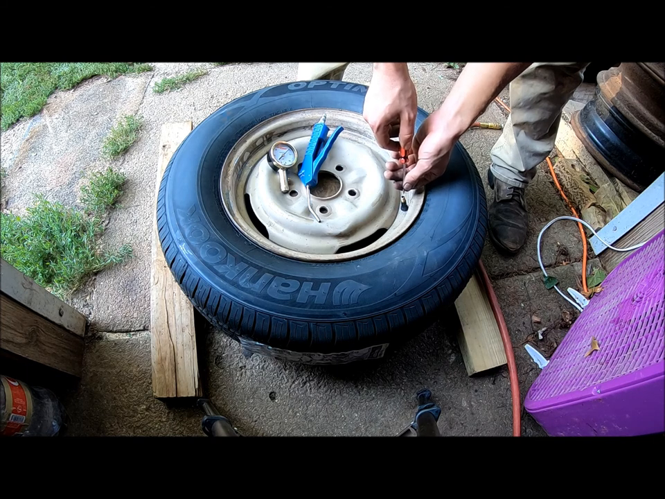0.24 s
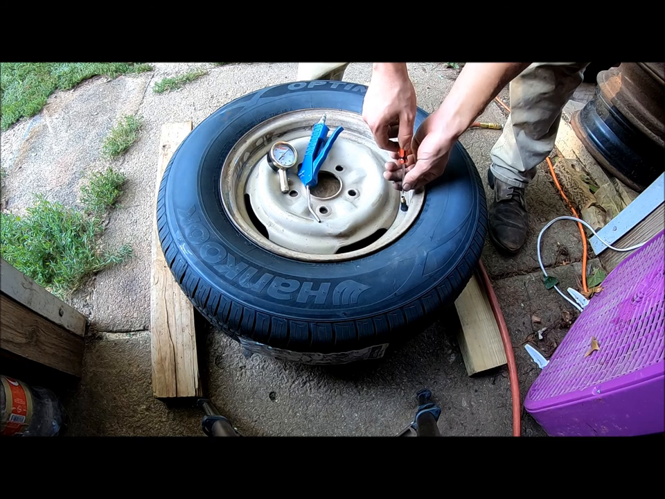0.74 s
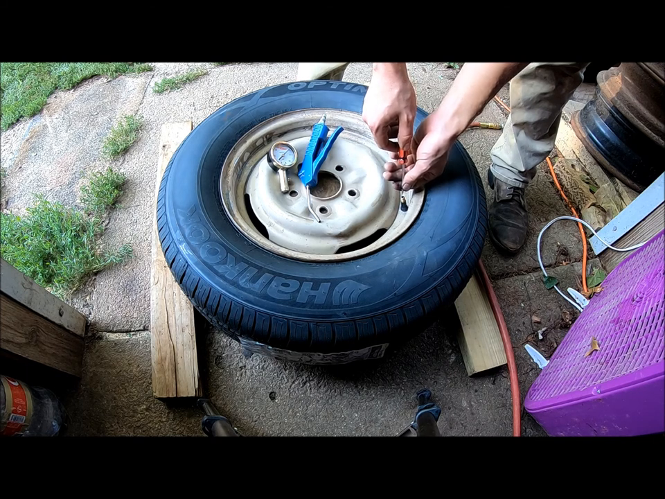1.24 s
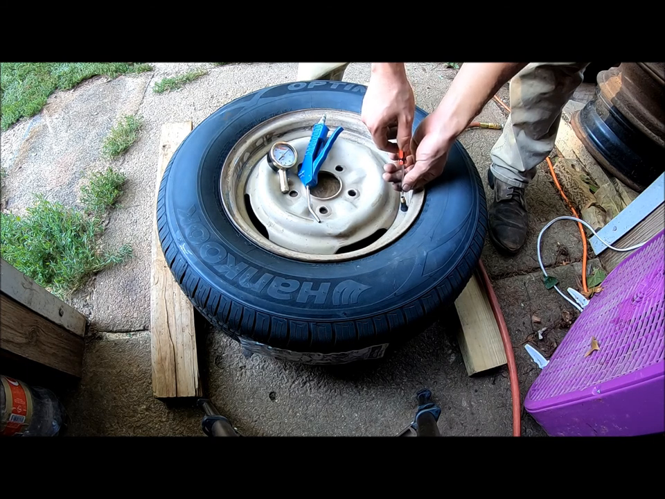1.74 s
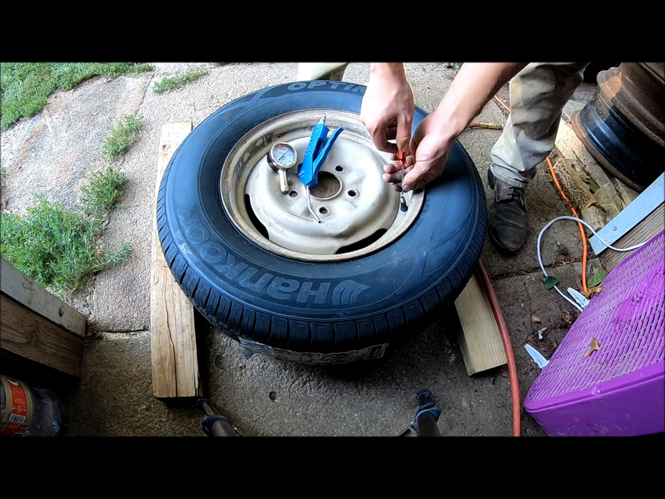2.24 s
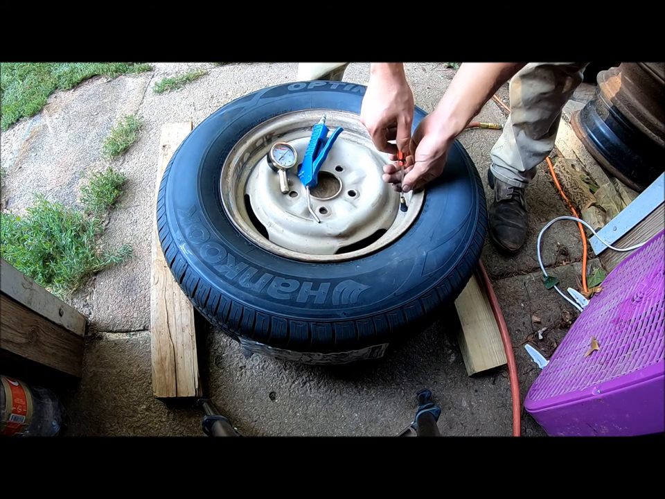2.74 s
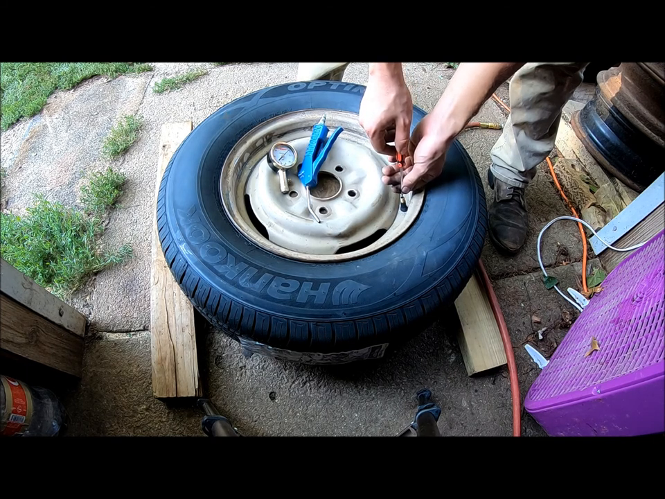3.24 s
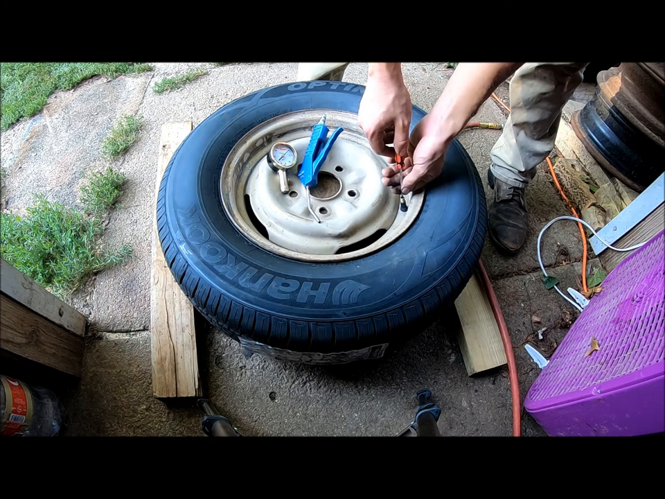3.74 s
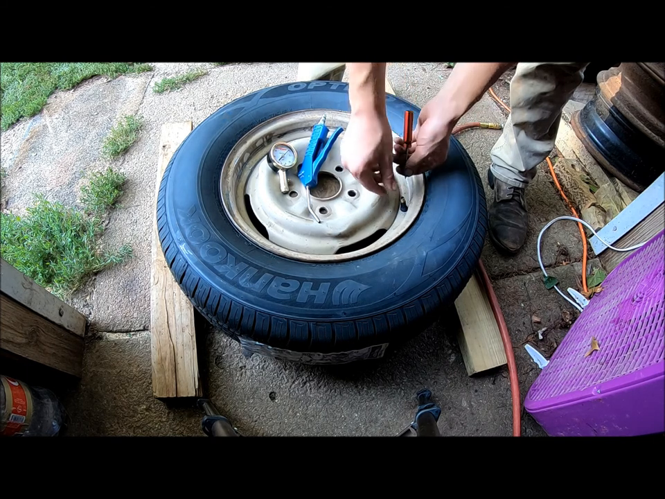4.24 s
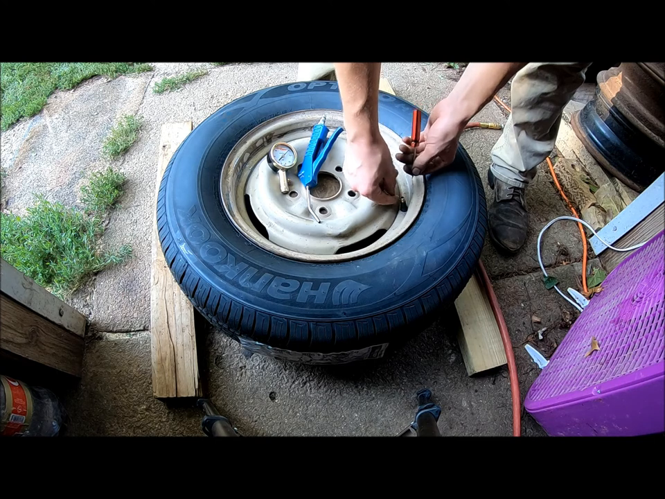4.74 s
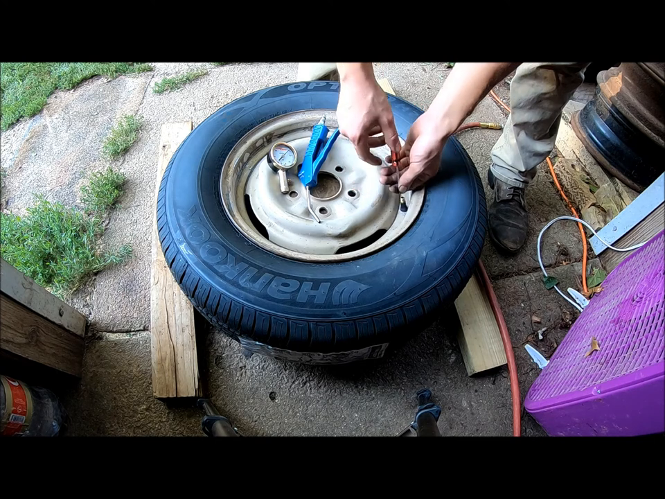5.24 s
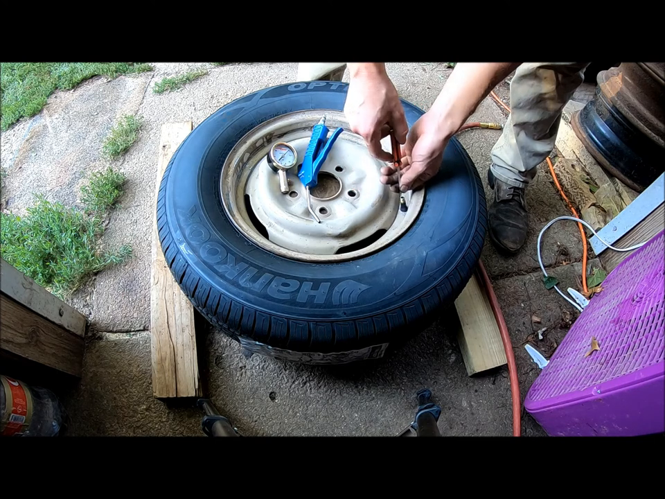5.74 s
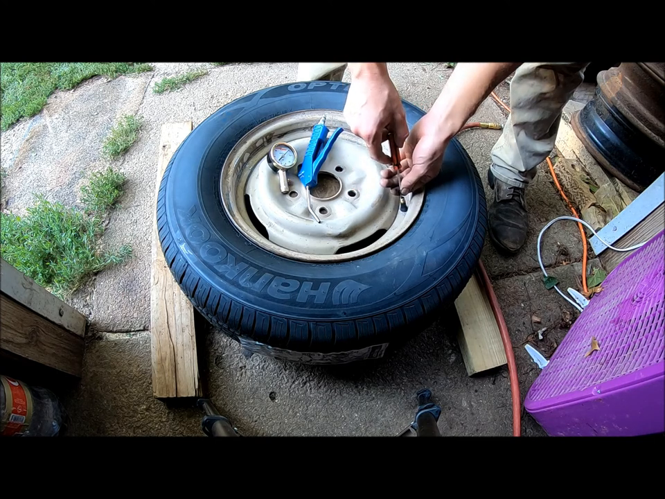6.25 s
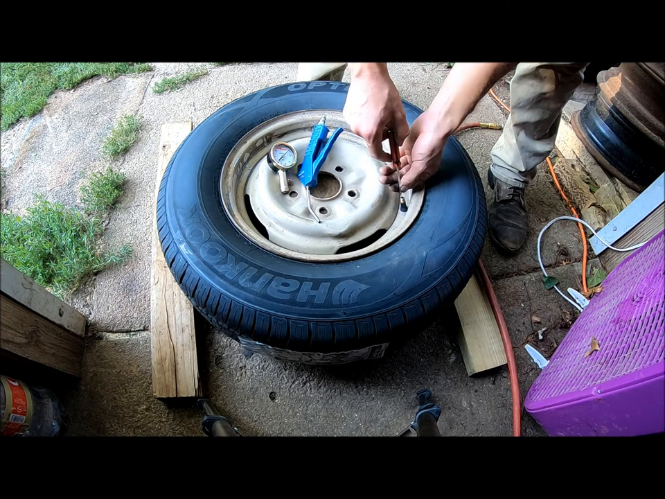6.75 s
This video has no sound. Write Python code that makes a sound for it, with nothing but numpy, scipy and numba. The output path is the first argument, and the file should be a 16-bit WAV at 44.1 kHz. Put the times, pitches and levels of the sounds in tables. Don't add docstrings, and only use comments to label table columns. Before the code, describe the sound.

From 0 s a tire valve is already venting: a dense, bright, sibilant hiss, strongest around seven kilohertz, with some midrange rush and little bass. It fluctuates finely and declines smoothly. Around 1.2 s the colour shifts a little as hands move, and from about 2.2 s a narrow airy whistle stands out more. By 4 s the jet is clearly weaker and slacker. At about 4.6 s a fingertip shuts it almost instantly, leaving a tiny leak and exposing a quiet low fan hum; at about 4.7 s it opens again over a tenth of a second, with a thin singing tone at about 4.8 s. The softer hiss continues, changing shade around 5.4 and 6 s, then sinks further from 6.5 s to about 7 s, with a faint clearer whistle. Close stereo perspective, short reflections off wheel, floor and walls.

```python
import sys
import numpy as np
from scipy import signal
from scipy.fft import rfft, irfft, next_fast_len
from scipy.io import wavfile
from scipy.ndimage import uniform_filter1d
from numba import njit

SR = 44100
rng = np.random.default_rng(int(sys.argv[2]) if len(sys.argv) > 2 else 0)


def master_out(mix):
    frames = np.transpose(np.atleast_2d(mix))
    ceiling = np.clip(frames, -1, 1)
    pcm = np.round(ceiling * 32767).astype(np.int16)
    wavfile.write(sys.argv[1], SR, pcm)


def to_linear_factor(level_db):
    exponent = np.asarray(level_db, float) / 20
    return 10 ** exponent


N = 307818


def rms_one(x):
    return x / np.sqrt(np.mean(x ** 2) + 1e-20)


def at_hz(points, hz):
    table_hz, values = np.transpose(points)
    return np.interp(np.log(hz + 1), np.log(table_hz), values)


def in_time(rows):
    s, *columns = np.transpose(rows)
    return [np.interp(np.arange(N) / SR, s, c) for c in columns]


def held(rows):
    move_s = 0.048
    s, *columns = np.transpose(rows)
    now = np.searchsorted(s, np.arange(N) / SR, side="right") - 1
    now = np.maximum(now, 0)
    return [uniform_filter1d(c[now], size=int(move_s * SR), mode="nearest") for c in columns]


def shaped(x, response):
    size = next_fast_len(N + SR // 2)
    hz = np.arange(size // 2 + 1) * SR / size
    return irfft(rfft(x, size) * response(hz), size)[..., :N]


def drift(rate_hz):
    r = np.exp(-80 * np.pi * rate_hz / SR)
    slow = signal.lfilter([1], [1, -2 * r, r * r], rng.standard_normal(N // 40 + 2002))
    slow = slow[2000:]
    return np.interp(np.arange(N) / 40, np.arange(len(slow)), rms_one(slow))


def bell(hz, centre_hz, width_hz):
    return 1 / (1 + (2 * (hz - centre_hz) / width_hz) ** 2)


@njit
def gliding(x, hz, r):
    out = np.zeros(len(x))
    for i in range(2, len(x)):
        turn = 2 * r * np.cos(2 * np.pi * hz[i] / SR)
        out[i] = x[i] - x[i - 2] + turn * out[i - 1] - r * r * out[i - 2]
    return out


def with_peak(x, hz, db, width_hz):
    r = np.exp(-np.pi * width_hz / SR)
    once = gliding(rng.standard_normal(N), hz, r)
    ringing = gliding(once, hz, r)
    return (rms_one(x) + to_linear_factor(db) * rms_one(ringing)) / np.sqrt(1 + to_linear_factor(2 * db))


def fan():
    # f/Hz, spectral level/dB per Hz
    fan_air = [(12, -44), (20, -8.5), (59, -14.5), (92, -18.5), (157, -3.5), (179, -5.5), (215, -5),
               (231, -2.5), (248, -1.5), (274, -5), (321, -9), (471, -22), (600, -21.5), (780, -20),
               (1320, -34), (2500, -60)]
    # f/Hz, width/Hz, rms level/dB
    fan_tones = [
        (48.4, 2.5, -81),
        (168, 14, -70),
    ]
    air = rng.standard_normal((2, N)) + 0.11 * rng.standard_normal(N)
    out = to_linear_factor(-59.5) * rms_one(shaped(air, lambda hz: to_linear_factor(at_hz(fan_air, hz))))
    for at, width, db in fan_tones:
        out = out + to_linear_factor(db) * rms_one(shaped(air[::-1], lambda hz: bell(hz, at, width)))

    blade_hz, blade_db, waver_db = 247.8, -63.5, 1.5
    phase = 2 * np.pi * blade_hz * np.arange(N) / SR + 0.5 * drift(1)
    out = out + to_linear_factor(blade_db + 3 + waver_db * drift(2)) * np.sin(phase + [[0], [1.2]])

    hiss = shaped(rng.standard_normal((2, N)), lambda hz: (bell(hz, 1500, 6000) + 0.05) * hz / (hz + 300))
    return out + to_linear_factor(-66) * rms_one(hiss)


def stirred_tail(x):
    renew_s, t60_s, bright_t60_s, bright_from_hz = 0.12, 0.24, 0.16, 8400
    hop, t = int(renew_s * SR), np.arange(SR // 4) / SR
    decay = to_linear_factor(-60 * t / [[t60_s], [bright_t60_s]]) * np.minimum(t / 0.0014, 1)
    decay = decay / np.sqrt(np.sum(decay ** 2, axis=1, keepdims=True))
    dull = signal.butter(6, bright_from_hz, "low", fs=SR, output="sos")
    bright = signal.butter(6, bright_from_hz, "high", fs=SR, output="sos")
    fade = np.sin(np.pi * np.arange(2 * hop) / (2 * hop))
    padded = np.pad(x, (hop, 2 * hop))
    out = np.zeros((2, N + 4 * hop + len(t)))
    for i in range(0, N + hop, hop):
        low, high = rng.standard_normal((2, 2, len(t)))
        scatter = signal.sosfilt(dull, low) * decay[0] + signal.sosfilt(bright, high) * decay[1]
        stretch = padded[i:i + 2 * hop] * fade
        heard = signal.fftconvolve(stretch[None], scatter, axes=1)
        out[:, i:i + heard.shape[1]] += heard
    return out[:, hop:hop + N]


def garage(x):
    # left delay/ms, right delay/ms, left level/dB, right level/dB
    echoes = [
        (.55, 0.64, -17, -17.5),
        (1.8, 1.6, -19, -17),
        (3.1, 4.9, -19, -32),
        (4.6, 3.8, -23, -15),
    ]
    # f/Hz, level/dB
    tail_colour = [(400, 6), (1000, -0.5), (2000, -5.5), (3700, -6.5), (5200, -2.5), (7300, -5), (9000, 5),
                   (11000, 2), (13000, -0.5), (15000, -1)]
    ms_left, ms_right, left_db, right_db = np.transpose(echoes)[:, :, None]

    def comb(hz, ms, db):
        return 1 + np.sum(to_linear_factor(db) * np.exp(-2j * np.pi * hz * ms / 1000), axis=0)

    near = shaped(x, lambda hz: np.array([comb(hz, ms_left, left_db), comb(hz, ms_right, right_db)]))
    return near + shaped(stirred_tail(x), lambda hz: to_linear_factor(at_hz(tail_colour, hz)))


def jet_colour(hz):
    # f/Hz, spectral level/dB per Hz
    broad = [(210, -17), (350, -26), (610, -25), (824, -14.5), (1190, -17), (1560, -14.5), (2390, -10),
             (3610, -9.5), (5190, -12.5), (7130, -4), (7600, -6.5), (8630, -20.5), (10900, -28.5),
             (13200, -27), (15500, -38)]
    # f/Hz, width/Hz, lift/dB
    hollows = [(1520, 420, 8.5), (2112, 340, 5.5), (2500, 68, 1), (3800, 120, 2), (4360, 240, -1.5),
               (6400, 220, -1), (6760, 250, -4.5), (6900, 270, 4.5), (7180, 60, -1.5), (7390, 100, 3),
               (7620, 47, 2.5), (9850, 330, 6), (10250, 200, 3), (5020, 1700, -3), (4110, 200, 4),
               (4500, 130, 0), (6600, 120, -1), (13250, 920, 6.5)]
    low_cut_hz = 192
    lifts_db = sum(db * bell(hz, at, width) for at, width, db in hollows)
    return to_linear_factor(at_hz(broad, hz) + lifts_db) * hz ** 4 / (hz ** 4 + low_cut_hz ** 4)


def opening():
    stop_s, close_s, lift_s, reopen_s, reopen_bend, leak_db = 4.589, 0.012, 4.69, 0.12, 1.45, -26.5
    t = np.arange(N) / SR
    closing = np.clip((t - stop_s) / close_s, 0, 1)
    release = np.clip(1 - (t - lift_s) / reopen_s, 0, 1) ** reopen_bend
    return 1 - closing * release * (1 - to_linear_factor(leak_db))


def turbulence(pressure_db):
    # f/Hz, level/dB
    slack_colour = [(500, -7), (1000, -2), (1600, -4), (3100, 1.5), (4400, 2.5), (5200, 4.5), (6000, -7),
                    (6500, 0.5), (7050, -13.5), (7600, -4), (8100, 3), (9000, -2.5), (11000, -8),
                    (13200, -3.5)]
    # from t/s, level/dB
    palm = [
        (0, 2),
        (1.2, -2),
        (2.35, -0.5),
        (4.43, 0.6),
        (4.79, 3),
        (4.96, 0.5),
        (5.6, 0.2),
        (6.6, -2.5),
    ]
    firm = shaped(rng.standard_normal(N), jet_colour)
    slack = np.clip((-38 - pressure_db) / 12, 0, 0.63)  # onset/dB, span/dB, greatest share
    hiss = (1 - slack) * firm + slack * shaped(firm, lambda hz: to_linear_factor(at_hz(slack_colour, hz)))
    palm_db, = held(palm)
    return hiss + (to_linear_factor(palm_db) - 1) * shaped(hiss, lambda hz: bell(hz, 5270, 680))


def jet():
    edges_hz = [2500, 6000, 8500]
    # t/s, level/dB
    pressure = [(0, -30.5), (1.1, -33.5), (1.5, -33.5), (2.2, -35), (2.5, -36), (3.8, -39.5), (4.15, -41),
                (5.1, -45.5), (6.45, -45), (6.98, -51)]
    # level re pressure/dB, share of the splash, steepness with which it follows the opening
    regions = [
        (-12, 1.04, 0.47),
        (-5, 0.31, 1.36),
        (0, -0.2, 1.3),
        (-15.5, 0.18, 0.84),
    ]
    # from t/s, shade/dB, splash of air on skin/dB, hollow f/Hz, hollow level re body/dB
    poses = [(0, -0.2, 2, 3720, -4), (0.3, -0.1, 2.4, 3540, -4), (0.68, 0, 2.5, 3650, -7),
             (1.2, -0.3, 0.9, 3800, -22), (1.45, -1.05, 0.5, 3840, -18), (2.05, 0, 0.4, 3730, -10),
             (3.3, 0.4, -0.5, 3680, -11), (3.95, 0.5, -0.1, 3580, -13.5), (4.17, -0.5, -3, 3330, -23),
             (4.43, 2, 0.6, 3120, -21), (4.62, 3, -7, 3280, -20), (4.79, 3.5, -3, 4470, -13),
             (4.96, 1.2, -1.5, 3640, -10), (5.36, 1, 3, 3160, -11), (5.8, -1.5, 1.5, 3620, -7),
             (6.05, -1.2, 3.5, 3720, -19), (6.64, -1, 2.5, 4050, -9)]
    # from t/s, f/Hz, level re stem band/dB
    whistle = [(0, 7390, -14), (1.2, 7100, -8), (2.2, 7200, -3), (3.2, 7620, -3.5), (4.1, 7100, -8),
               (4.43, 7140, -12), (4.65, 7590, -3.5), (4.95, 7600, -5.5), (5.3, 7540, -4), (5.5, 7900, -5),
               (5.75, 7510, -3), (6.5, 7530, -5)]
    # from t/s, f/Hz, level re body/dB
    slit = [
        (0, 3770, -25),
        (4.43, 3120, -17),
        (4.62, 4330, -25),
        (4.79, 4330, -3),
        (4.94, 3700, -12),
        (5.2, 3090, -16),
        (6.05, 3050, -11),
        (6.25, 3710, -18),
        (6.66, 4030, -6),
    ]
    pressure_db, = in_time(pressure)
    shade_db, splash_db, hollow_hz, hollow_db = held(poses)
    whistle_hz, whistle_db = held(whistle)
    slit_hz, slit_db = held(slit)

    hiss = turbulence(pressure_db)
    below = [shaped(hiss, lambda hz: 1 / (1 + (hz / edge) ** 12)) for edge in edges_hz]
    rush = rms_one(below[0])
    body = with_peak(below[1] - below[0], hollow_hz, hollow_db, width_hz=600)
    body = with_peak(body, slit_hz, slit_db, width_hz=170)
    stem = with_peak(below[2] - below[1], whistle_hz, whistle_db, width_hz=270)
    fizz = rms_one(hiss - below[2])

    flutter_db = 0.072 * drift(2.3) + 0.18 * drift(14) + 0.49 * drift(68)
    free = opening()
    out = np.zeros(N)
    for x, (db, share, steepness) in zip((rush, body, stem, fizz), regions):
        own_db = 0.55 * drift(8.4)
        out += x * free ** steepness * to_linear_factor(db + share * splash_db + own_db)
    return to_linear_factor(pressure_db + shade_db + flutter_db - 2) * out


def scene():
    # from t/s, left over right level/dB
    lean = [
        (0, -0.3),
        (2, -.7),
        (4.45, 2),
        (5, 1),
    ]
    air = garage(jet())
    lean_db, = held(lean)
    stem = shaped(air, lambda hz: bell(hz, 7300, 2000))
    return air + (to_linear_factor(lean_db * [[0.5], [-0.5]]) - 1) * stem + fan()


def top_cut(x):
    return signal.sosfilt(signal.butter(12, 15750, fs=SR, output="sos"), x)


def record(dry):
    # f/Hz, level/dB
    left_over_right = [(30, -5), (60, 1), (150, 2), (400, 0), (800, -0.5), (2000, -1), (5000, 0.5),
                       (6500, 2), (7200, 5.5), (7800, 3), (8300, 2), (10000, 1.5), (13000, 1.5),
                       (15500, 10)]
    # f/Hz, phase/rad
    right_lead = [(1000, 0.), (6000, .3), (7500, .5), (8300, 2.1), (9500, 2.2), (10800, .4), (14000, .6)]

    def ports(hz):
        half = to_linear_factor(at_hz(left_over_right, hz) / 2) * np.exp(-0.5j * at_hz(right_lead, hz))
        return np.array([half, 1 / half])

    return top_cut(shaped(dry, ports))


dry = scene()
out = record(dry)
master_out(out)
```